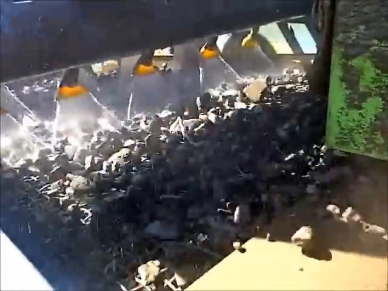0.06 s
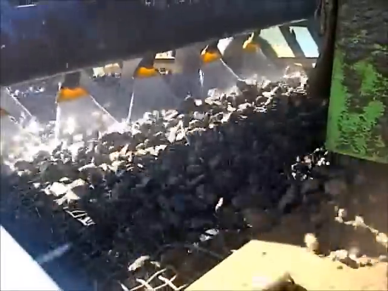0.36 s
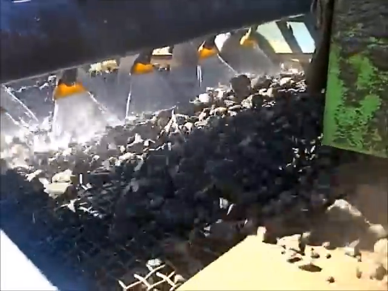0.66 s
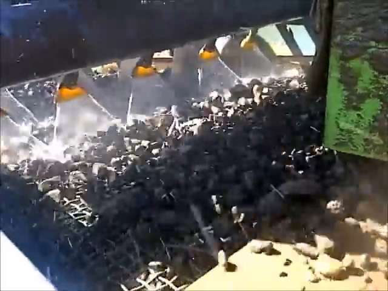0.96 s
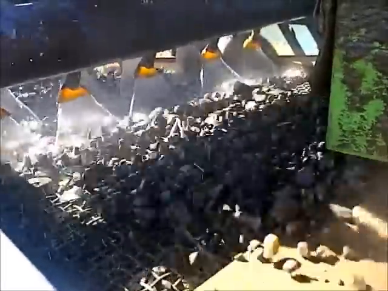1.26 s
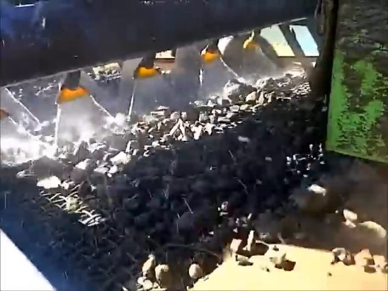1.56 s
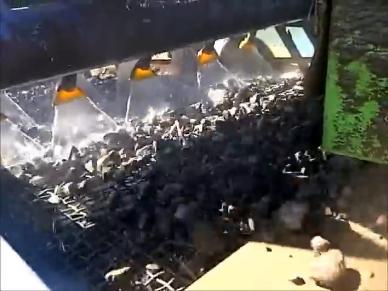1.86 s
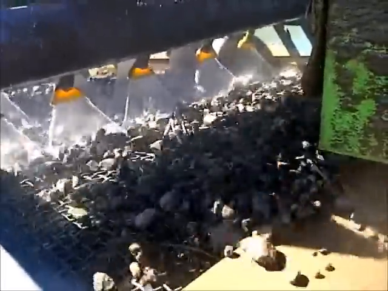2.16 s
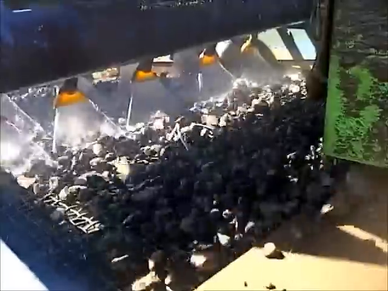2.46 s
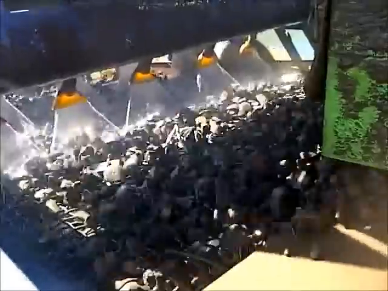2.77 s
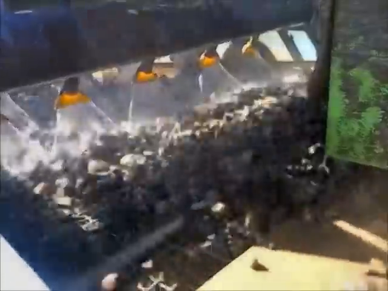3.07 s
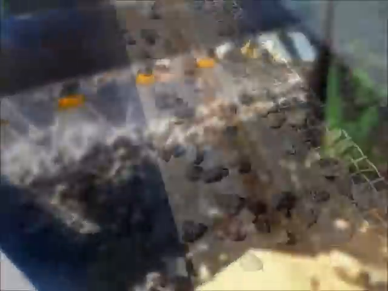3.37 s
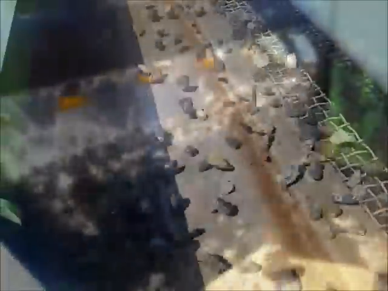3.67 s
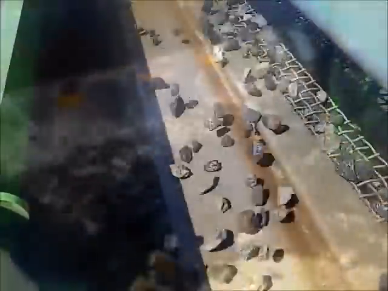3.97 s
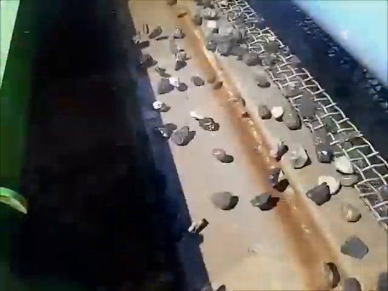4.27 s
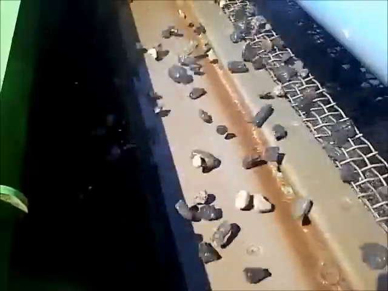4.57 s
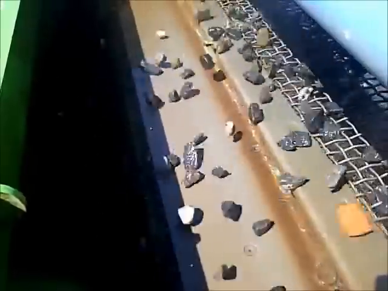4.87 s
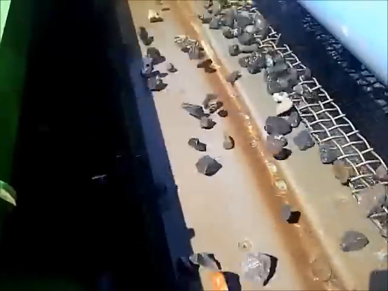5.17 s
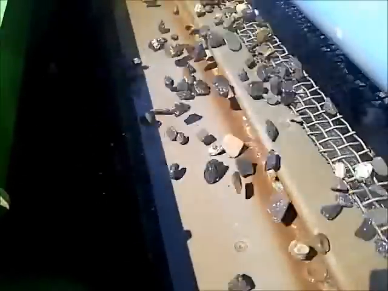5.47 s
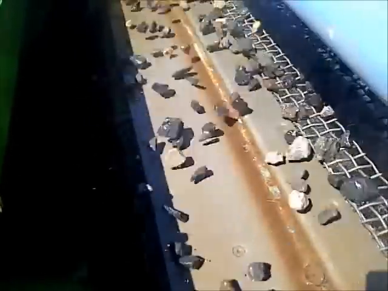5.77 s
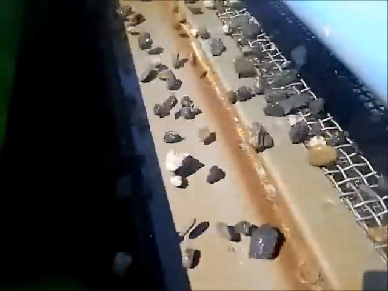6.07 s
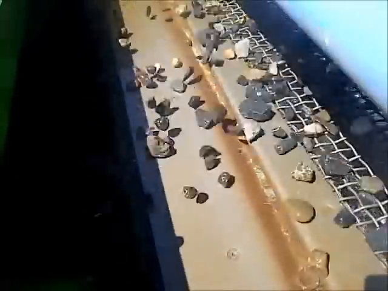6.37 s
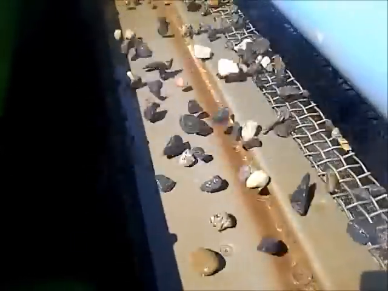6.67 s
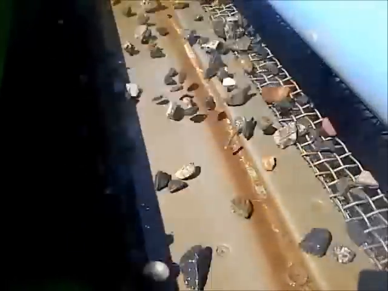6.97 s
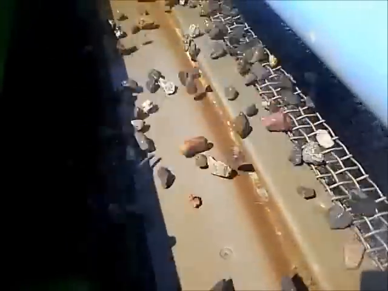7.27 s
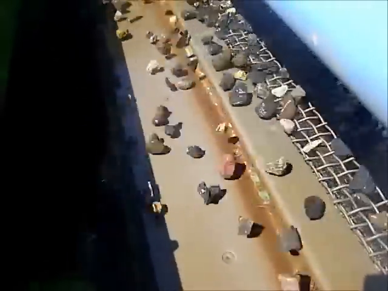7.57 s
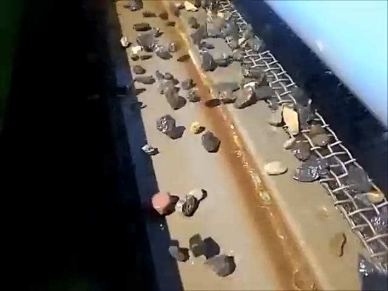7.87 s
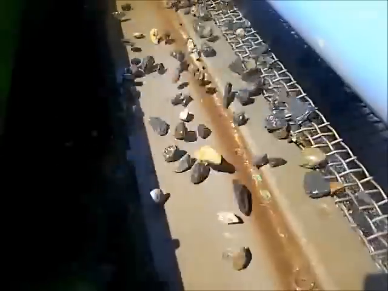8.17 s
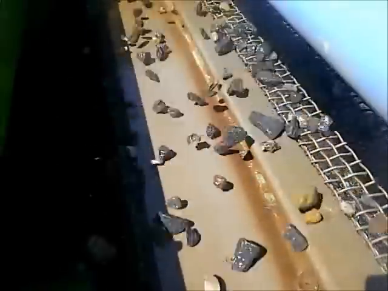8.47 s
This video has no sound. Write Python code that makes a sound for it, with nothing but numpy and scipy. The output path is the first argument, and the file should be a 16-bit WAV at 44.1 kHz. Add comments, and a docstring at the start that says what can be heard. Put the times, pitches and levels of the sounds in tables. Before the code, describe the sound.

A vibrating screen shakes gravel in a dense, pulsing rattle, with water spray hiss, machine rumble and occasional clanks on steel.

```python
"""Wet crushed stone churns under hissing water jets, with a low rumble, on an outdoor washing screen.
The screen shakes about 17 times a second, throwing the stones up to land in a rush on mesh and steel.
Large stones knock together, make the steel ring or thud on the deck, the floor of the screen.
The deep bed of stone comes first. At 3 s the thinner stream at the lip, where the stones leave,
joins in, and from 4.5 s the bed is no longer heard."""
import sys
import numpy as np
from scipy import signal
from scipy.fft import rfft, irfft
from scipy.io import wavfile

SR = 44100
rng = np.random.default_rng(int(sys.argv[2]) if len(sys.argv) > 2 else 0)


def inscribe(sig):
    """Save sig as 16-bit PCM at rate SR to the path in sys.argv[1].

    A 1-D sig is mono; a 2-D sig holds one channel per row.
    Samples are clipped to [-1, 1] before scaling.
    """
    pcm = np.round(np.clip(np.atleast_2d(sig).T, -1, 1) * 32767)
    wavfile.write(sys.argv[1], SR, pcm.astype(np.int16))


N = 380583
TIME = np.arange(N) / SR
SHAKE_HZ = 16.651

# The notes at which the steel screen box rings: pitch_hz, width_hz, bed_boost_db, lip_boost_db
STEEL_NOTES = [(182, 13, 1.5, 4), (320, 49, 1.5, -1.5), (455, 71, 2, 3.5), (565, 8.2, 3, 5.5),
               (700, 23, 3, 0.5), (738, 22, -1.5, 1.5), (864, 60, 1.8, 3.2), (1023, 14, 4.5, 1.5),
               (1084, 23, -2.5, 1), (1213, 70, 0, 3.5), (1316, 40, 0.5, 4.5), (1654, 35, 2, 3.5),
               (1770, 85, 0.8, 4.5), (2070, 79, 2.5, 3), (2530, 200, 0.5, 3.5), (3530, 210, 0, 2),
               (4120, 130, 2.5, 2), (4620, 330, 2.5, 0)]
# The tone of the water jets, from low to high: pitch_hz, level_db
SPRAY_TONE = [(700, -17.5), (2000, 3.5), (3000, -6), (3600, -3), (4700, -5.5), (6000, -3.5), (7400, -11.5)]


def sprayed_bed():
    """A deep, wet layer of stone churns under water jets, whose hiss fills the gaps between shakes."""
    # How closely the stones land together in each shake (higher is closer): time_s, bunching
    bunching_curve = [(0, .5), (0.3, .32), (1.05, .49), (1.9, .47), (2.15, .74), (2.45, .48), (2.9, .38),
                      (3.3, .47)]
    # The tone of the rushing stone: pitch_hz, level_db
    stone_tone = [(110, -36), (190, -16), (316, -4.5), (400, -8.5), (574, -1), (772, -1.5), (1010, 0),
                  (1110, -1), (1270, 0.5), (2140, -3.5), (2920, -7.5), (3470, -6), (4900, -9), (6810, -15),
                  (7600, -22), (9880, -56), (16700, -120)]
    # The load of stone, nearly steady with one gentle swell: time_s, level_db
    stone_levels = [(0, -40), (2.4, -40.5), (3.1, -40), (3.7, -39.5), (4.2, -41.5)]
    # The hiss of the jets grows louder: time_s, level_db
    spray_levels = [(0, -57.5), (2.55, -59.5), (3.2, -54.5), (3.8, -57), (4.45, -53)]
    # The tone of the machine's frame and drive: pitch_hz, level_db
    rumble_tone = [(20, -9), (35, -14.5), (60, -7.5), (95, -6.5), (135, -1.5), (165, -2), (200, 1),
                   (260, 2), (420, 0.5), (1000, -35.5)]
    share = landings(first_s=.0131, bunching=follow(bunching_curve), skew=.25) * from_db(.6 * drift(16))
    rush = stone_rush(share, per_s=14000, spread_db=2.0, split_hz=670, tumble_s=.005, lump_db=1.1)
    hits = clacks(share, per_s=300, low_hz=477.3, high_hz=2424, sharpness=21, spread_db=1.9)
    stones = with_tone(rush, stone_tone) + from_db(-13.5) * hits
    stones = through_steel(stones, [bed_db for *_, bed_db, lip_db in STEEL_NOTES])
    spray = from_db(follow(spray_levels)) * water_jets()
    rumble = from_db(-61) * frame_rumble(rumble_tone, uneven_db=1.3)
    return from_db(follow(stone_levels)) * with_clumps(stones) + spray + rumble


def discharge_lip():
    """Loose stones hop over bare steel in step, so each shake stands out; the jets are farther off."""
    # The tone of the rushing stone: pitch_hz, level_db
    stone_tone = [(110, -42), (180, -17), (207, -17), (347, -8.5), (400, -11.5), (556, -3), (611, -5.5),
                  (714, -2), (1270, -1.5), (1560, -3), (1770, -2.5), (2540, -3.5), (3110, -6.5), (4530, -4),
                  (7600, -20.5), (9880, -60), (16700, -120)]
    # The tone of the machine's frame and drive: pitch_hz, level_db
    rumble_tone = [(20, -16), (52, -14), (95, -9), (135, -3), (170, 0.5), (205, 0.5), (300, 7.5),
                   (420, 2.5), (1000, -21)]
    share = landings(first_s=.0412, bunching=.88, skew=.36) * from_db(.6 * drift(12))
    rush = stone_rush(share, per_s=12000, spread_db=2.0, split_hz=810, tumble_s=.008, lump_db=0.56)
    hits = clacks(share, per_s=260, low_hz=706.6, high_hz=6975, sharpness=44, spread_db=0.9)
    stones = with_tone(rush, stone_tone) + from_db(-11) * hits
    stones = through_steel(stones, [lip_db for *_, bed_db, lip_db in STEEL_NOTES])
    spray = from_db(-15) * water_jets()
    rumble = from_db(-20) * frame_rumble(rumble_tone, uneven_db=2.5)
    return from_db(-45) * (with_clumps(with_deck_ring(stones)) + spray + rumble)


def landings(first_s, bunching, skew):
    """The share of stones landing at each moment rises and falls with every shake; its average is 1."""
    phase = 2 * np.pi * SHAKE_HZ * (TIME - first_s)
    share = np.exp(bunching * np.cos(phase + skew * np.cos(phase)))
    return share / share.mean()


def impacts(per_s, spread_db):
    """Stones touch at random moments, each making a click of its own strength."""
    sizes = from_db(spread_db * np.minimum(rng.exponential(1, N), 4)) * rng.choice([-1, 1], N)
    return unit_power(sizes * (rng.random(N) < per_s / SR))


def stone_rush(share, per_s, spread_db, split_hz, tumble_s, lump_db):
    """Small chips give the bright part; big stones give the dull part and tumble on after landing."""
    fade = np.exp(-1 / (tumble_s * SR))
    tumbling, _ = signal.lfilter([1 - fade], [1, -fade], share, zi=[fade])
    tumbling *= from_db(lump_db * drift(25))
    chips = filtered(impacts(per_s * share, spread_db), "high", split_hz, order=2)
    lumps = filtered(impacts(per_s * tumbling, spread_db), "low", split_hz, order=2)
    return chips + lumps


def clacks(share, per_s, low_hz, high_hz, sharpness, spread_db, count=36):
    """Single stones hit bare mesh or plate and ring briefly, each at one of many pitches."""
    hits = impacts(per_s * share ** 2, spread_db)
    pitch_choice = rng.integers(0, count, N)
    rings = (resonance(hits * (pitch_choice == k), hz, hz / sharpness) / hz ** 0.69
             for k, hz in enumerate(np.geomspace(low_hz, high_hz, count)))
    return unit_power(sum(rings))


def through_steel(stones, boosts_db):
    """The steel plates ring along at their own notes, making each one stronger or weaker."""
    ringing = sum((from_db(boost_db) - 1) * resonance(stones, hz, width_hz)
                  for (hz, width_hz, *_), boost_db in zip(STEEL_NOTES, boosts_db))
    return unit_power(stones + ringing)


def with_clumps(stones):
    """Each clump of coarse stone swells the dull part of the rush for a few shakes."""
    # Clumps tumbling through: middle_s, boost_db
    clumps = [(0.21, 1.5), (0.82, 2.1), (1.03, 0), (1.25, 2), (1.4, 1.8), (1.87, 2.5), (2.86, 2), (3.17, 1),
              (3.45, -0.9), (3.59, 1.2), (3.93, 1.8), (4.31, 0.9), (4.72, 1.2), (5.26, 1.1), (6.29, 0.8),
              (7.1, 2)]
    half_length_s = 0.06
    swell_db = sum(boost_db * np.exp(-((TIME - s) / half_length_s) ** 2) for s, boost_db in clumps)
    return stones + (from_db(swell_db) - 1) * filtered(stones, "low", hz=2800)


def with_deck_ring(stones):
    """The bare deck plate at the lip sings more or less as the stones strike it."""
    # The plate's ring, strongest near the end: time_s, boost_db
    ring_boosts = [(3.0, -2), (3.9, 1.5), (4.8, 0), (6.3, 0.5), (7.2, -1.5), (7.7, 0), (8.6, 2)]
    return stones + (from_db(follow(ring_boosts)) - 1) * resonance(stones, hz=1740, width_hz=240)


def clanks():
    """A large stone strikes the steel and leaves one dying tone."""
    # Blows on steel (fade_s is the time to drop by 60 dB): start_s, pitch_hz, peak_db, fade_s
    blows = [(1.252, 2150, -37, .05), (1.683, 1450, -34, .05), (2.052, 1250, -38, .13),
             (2.598, 577, -43, 0.47), (2.785, 870, -41.5, .2), (3.915, 565, -45, 1.1),
             (3.972, 686, -43, 0.1), (4.293, 1280, -37, 0.14), (4.781, 2050, -41, 0.066),
             (4.892, 565, -45.5, 0.16), (5.013, 1073, -44, 0.18), (5.262, 880, -39.5, 0.1),
             (5.668, 574, -48, 0.15), (6.243, 600, -50, 0.11), (6.643, 2792, -48, 0.16),
             (6.823, 735, -44.5, 0.11), (7.992, 1900, -44, .1), (8.262, 1000, -41.5, 0.071),
             (8.38, 1633, -46, 0.16)]
    return sum(dying_tone(*blow) for blow in blows)


def knocks_on_stone():
    """A large stone lands on others: a short crunch of contacts, pitched by its size."""
    # Stone landing on stone: start_s, pitch_hz, level_db
    knocks = [(0.259, 1300, -38), (0.296, 1300, -37), (0.343, 1400, -36), (1.018, 1200, -32),
              (1.036, 1620, -40), (1.459, 1100, -39), (1.570, 1250, -38), (2.390, 1300, -35),
              (2.804, 2600, -38), (3.185, 1200, -35), (3.296, 1300, -39), (4.522, 1200, -40),
              (4.677, 850, -44), (6.029, 1500, -42.5), (6.829, 1200, -46), (7.294, 1400, -41.5),
              (7.465, 1100, -44), (7.590, 1500, -41)]
    rise_s, fade_s = 0.0046, 0.062
    out = np.zeros(N)
    age = np.arange(int(.1 * SR)) / SR
    for start_s, hz, level_db in knocks:
        grit = rng.standard_normal(len(age))
        width_hz = 0.74 * hz
        crunch = unit_power(resonance(resonance(grit, hz, width_hz), hz, width_hz))
        loudness = np.minimum(age / rise_s, 1) * from_db(level_db - 60 * age / fade_s)
        start = int(start_s * SR)
        out[start:start + len(age)] += crunch * loudness
    return out


def thuds():
    """The heaviest stones bend the deck at the lip, which answers with a short, dull note."""
    # Heavy stones dropping: start_s, peak_db
    drops = [(5.35, -57), (6.071, -55), (6.122, -59), (6.313, -54), (6.380, -53), (6.614, -55),
             (7.031, -53), (8.172, -56)]
    return sum(dying_tone(start_s, hz=230, peak_db=db, fade_s=0.078) for start_s, db in drops)


def water_jets():
    """Water hisses out of the spray bars."""
    return with_tone(rng.standard_normal(N), SPRAY_TONE)


def frame_rumble(tone, uneven_db):
    """The heavy frame rumbles unevenly around its lowest note; its deepest part flutters on its own."""
    shaking = with_tone(rng.standard_normal(N), tone)
    deep = filtered(shaking, "low", hz=90)
    flutter = from_db(4 * drift(10.5) - 1)
    rumble = shaking + (flutter - 1) * deep + from_db(-1) * resonance(shaking, hz=180, width_hz=15)
    return unit_power(rumble) * from_db(uneven_db * drift(4.3))


def dying_tone(start_s, hz, peak_db, fade_s):
    """A pure note that starts at once and drops by 60 dB in fade_s."""
    age = np.maximum(TIME - start_s, 0)
    return from_db(peak_db - 60 * np.minimum(age / fade_s, 3)) * np.sin(2 * np.pi * hz * age)


def with_tone(x, tone):
    """Shape the lows and highs of x by a tone table, fading beyond its ends; the power comes out as 1."""
    hz = np.maximum(np.arange(N // 2 + 1) * SR / N, 1)
    pitches, levels_db = np.transpose(tone)
    gain = from_db(np.interp(np.log(hz), np.log(pitches), levels_db))
    ends = np.minimum(hz / pitches[0], 1) * np.minimum(pitches[-1] / hz, 1)
    return unit_power(irfft(rfft(x) * ends ** 2 * gain, N))


def resonance(x, hz, width_hz):
    """Let through the pitches near hz; a narrower band rings longer."""
    r = np.exp(-np.pi * width_hz / SR)
    gain = (1 - r * r) / 2
    return signal.lfilter([gain, 0, -gain], [1, -2 * r * np.cos(2 * np.pi * hz / SR), r * r], x + 1e-18)


def filtered(x, side, hz, order=1):
    """Keep the "low" or the "high" side of hz."""
    return signal.sosfilt(signal.butter(order, hz, side, fs=SR, output="sos"), x)


def drift(rate):
    """A random wander of typical size 1, changing about rate times a second."""
    hz = np.arange(N // 2 + 1) * SR / N
    return unit_power(irfft(rfft(rng.standard_normal(N)) / (1 + (hz / rate) ** 2), N))


def follow(points):
    """Join (time_s, value) points with straight lines."""
    return np.interp(TIME, *np.transpose(points))


def heard(start_s, end_s):
    """On between two moments, with quick fades."""
    return np.clip(np.minimum(TIME - start_s, end_s - TIME) / .006 + .5, 0, 1)


def from_db(db):
    """Turn decibels into a number to multiply by."""
    return 10 ** (np.asarray(db) / 20)


def unit_power(x):
    """Scale x so that its average power is 1."""
    return x / np.sqrt(np.mean(x ** 2) + 1e-20)


def scene():
    """The bed and then the lip, overlapping for a while, the same in both ears."""
    bed = heard(start_s=-1, end_s=4.494) * sprayed_bed()
    lip = heard(start_s=3.005, end_s=10) * discharge_lip()
    screen = bed + lip + clanks() + knocks_on_stone() + thuds()
    return np.array([screen, screen])


def record(dry):
    """A small microphone softens two bands of the upper middle pitches and cuts the highest treble."""
    cutoff_hz = 8350
    hollow = dry - 0.3 * resonance(dry, hz=3005, width_hz=440)
    hollow -= 0.21 * resonance(dry, hz=1910, width_hz=70)
    return signal.sosfilt(signal.cheby2(14, 50, cutoff_hz, fs=SR, output="sos"), hollow)


dry = scene()
out = record(dry)
inscribe(out)
```